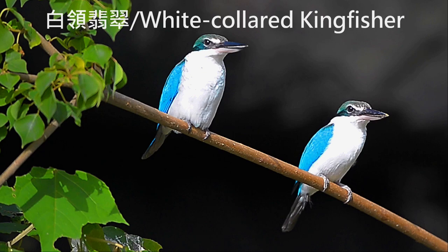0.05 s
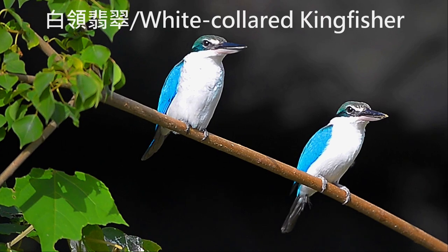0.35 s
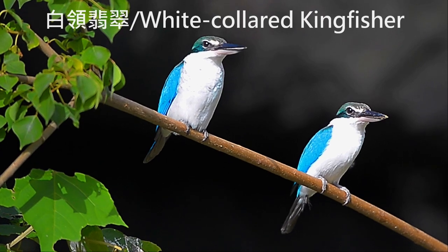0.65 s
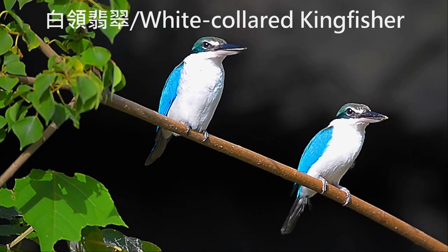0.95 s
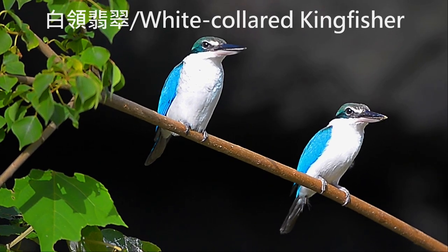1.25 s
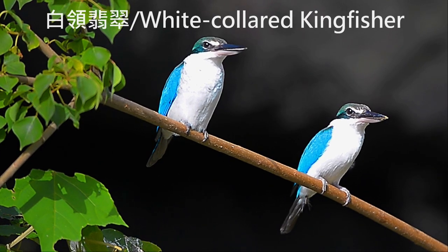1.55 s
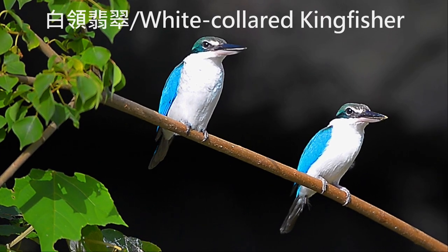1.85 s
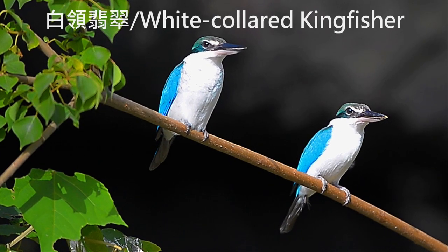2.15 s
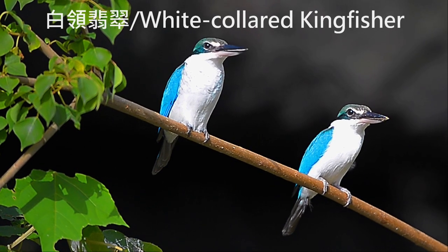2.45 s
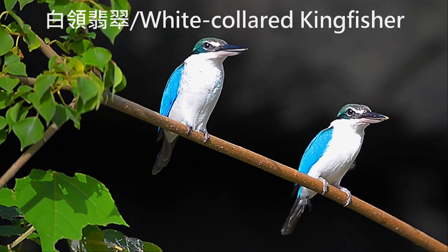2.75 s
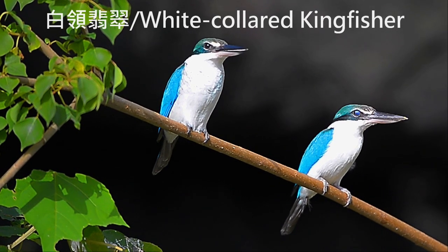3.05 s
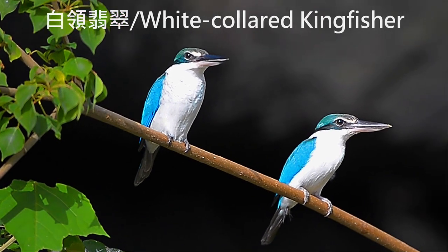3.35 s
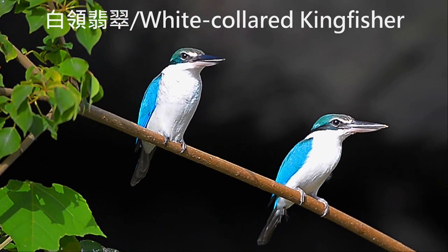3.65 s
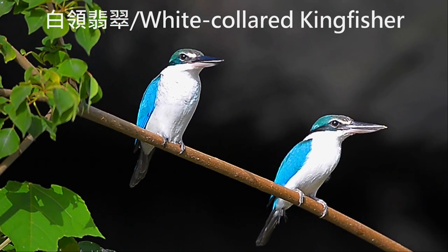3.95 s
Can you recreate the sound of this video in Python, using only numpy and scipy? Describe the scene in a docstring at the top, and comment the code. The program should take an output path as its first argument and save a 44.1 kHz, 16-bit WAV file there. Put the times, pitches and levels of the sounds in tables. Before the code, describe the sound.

A kingfisher gives four loud, falling calls, pauses, then gives two more, each run led by a softer note. The calls echo among trees over steady cicadas, faint distant birds, leaf hiss and a low rumble.

```python
"""Kingfisher in ringing woods

A kingfisher gives two runs of loud falling "kek" calls, each led by a softer arched note: harmonic
tones from its syrinx that reverberate among the trees. Behind it cicada tymbals drive narrow
resonances, far birds whistle and hoot, wood knocks, leaves hiss and a low rumble lies under everything.
Each loud call makes a compressor turn down the treble, so the cicadas duck."""
import sys
import numpy as np
from scipy import signal
from scipy.fft import rfft, irfft
from scipy.io import wavfile

SR = 44100
rng = np.random.default_rng(int(sys.argv[2]) if len(sys.argv) > 2 else 0)


def generate_wav(sig):
    """Save sig (samples, or channels by samples) to the path in sys.argv[1] as 16-bit PCM at SR."""
    pcm = np.round(np.clip(np.atleast_2d(sig).T, -1, 1) * 32767).astype(np.int16)
    wavfile.write(sys.argv[1], SR, pcm)


N = 176400
T = np.arange(N) / SR

# Levels in all tables are relative; each source applies its own gain.
# spectrum of the rumble and distant air: frequency_hz, density_db
RUMBLE_SPECTRUM = [(18, 5.5), (28, 0.5), (42, -3), (60, -10.5), (82, -5.5), (100, -15), (125, -19.5),
                   (180, -26), (215, -22.5), (300, -32), (440, -31), (600, -37.5), (900, -40),
                   (1400, -43.5), (1650, -37.5), (1900, -38)]
# spectrum of hissing leaves: frequency_hz, density_db
LEAF_SPECTRUM = [(1200, -16), (2000, 3), (3600, 9.5), (6000, -8), (7800, -19), (9500, -16), (11000, -20.5),
                 (15500, -21)]
# spectrum of a short rustle: frequency_hz, density_db
RUSTLE_SPECTRUM = [(3000, -25), (6000, -18), (9500, -17), (15000, -40)]
# spectrum of the far cicada chorus: frequency_hz, density_db
CHORUS_SPECTRUM = [(3700, -23), (4200, -10), (4500, -1), (4950, 0), (5250, -6), (5600, -15.5), (6100, -30),
                   (7000, -54.5)]
# cicada body resonances: centre_hz, bandwidth_hz, level_db
CICADA_RESONANCES = [(4544, 22, -39), (4678, 22, -39), (4834, 60, -37), (4995, 70, -36), (5058, 20, -35),
                     (5111, 16, -40), (5239, 20, -44), (8850, 600, -60)]
# a far bird's hoots: start_s, level_db
HOOT_NOTES = [(.07, -40), (1.023, -43), (1.333, -46), (1.535, -45), (1.721, -46), (2.234, -43.5),
              (2.677, -42), (2.999, -40.5), (3.383, -40.5), (3.91, -45.5)]
# distant knocks on wood: start_s, level_db
KNOCK_STRIKES = [(1.583, -27), (2.386, -35.5)]
# modes of the struck wood: frequency_hz, level_db, t60_s
WOOD_MODES = [(1020, -5, .05), (1130, -1, .06), (1240, 0, .06), (1370, -3, .05), (1520, -8, .04),
              (2150, -12, .03)]
# far birds' whistles: start_s, length_s, from_hz, to_hz, level_db
WHISTLE_NOTES = [(0.0, 0.076, 3250, 2897, -28), (0.0, 0.077, 1800, 1643, -39.5),
                 (.195, 0.024, 3230, 2820, -21.5), (0.198, 0.054, 1720, 1520, -40.5),
                 (1.862, 0.15, 4020, 3905, -32), (2.065, 0.16, 3980, 4030, -39.5),
                 (2.092, 0.05, 1790, 1815, -36.5), (2.208, 0.037, 1820, 1616, -34),
                 (2.318, 0.15, 2170, 2395, -32.5), (2.45, 0.051, 2475, 3204, -23.5),
                 (2.484, 0.041, 2950, 2670, -29.5), (3.255, 0.097, 1800, 1713, -36),
                 (3.376, 0.11, 1830, 1551, -39.5), (3.154, 0.042, 8300, 6540, -50)]
# contours of the two arched notes' second harmonic: time_s, pitch_hz, level_db
FIRST_ARCH = [(.31, 2420, -40), (0.323, 2390, -27.5), (0.334, 2662, -16), (0.368, 2740, -21.5),
              (.387, 2623, -11), (0.396, 2427, -22.5), (0.417, 1924, -34)]
SECOND_ARCH = [(3.455, 2600, -34), (3.464, 2448, -21), (3.474, 2850, -13), (3.496, 3083, -7),
               (3.515, 2929, -6.5), (3.526, 2617, -12.5), (3.545, 1930, -39)]
# harmonics of the arched notes and of the loud calls, from the fundamental up: level_db
ARCH_HARMONICS = [-21.5, -1.5, -22, -49, -61]
KEK_HARMONICS = [-22, 0, -40, -54, -58, -58]
# loud calls, pitched by the second harmonic: start_s, top_hz, length_s, level_db, dip_delay_s, dip_db
KEK_CALLS = [(.585, 3560, 0.076, 1.5, 0.033, 8.5), (.822, 3490, 0.092, 0.5, 0.028, 17.5),
             (1.08, 3449, .086, 0.5, 0.027, 6.5), (1.359, 3346, 0.087, -1.5, 0.014, 0.5),
             (3.7202, 3480, .076, 0.5, 0.025, 10), (3.967, 3446, 0.099, 2.5, 0.023, 14)]
# a call's leap and long slide in pitch: length_share, ratio_to_top
KEK_PITCH_CONTOUR = [(-.17, .79), (-.09, .85), (-.02, .92), (.015, .995), (.08, 1.0), (.18, .987),
                     (.3, .955), (.45, .905), (.6, .866), (.72, .83), (.8, .775), (.89, .69), (1.03, .53)]
# a call's envelope: length_share, level_db
KEK_ENVELOPE = [(-.17, -36), (-.1, -20), (-.01, -15), (.015, -4), (.13, 0), (.27, -2), (.45, -2),
                (.64, -2.5), (.78, -10), (.89, -20), (1.03, -40)]
# spectrum of the high, gritty rasp on the calls: frequency_hz, density_db
RASP_SPECTRUM = [(4000, -10), (6200, 10), (7200, 6), (8200, 0), (9500, -14), (11000, -15), (13000, -22),
                 (15000, -33)]


def from_db(db):
    """Amplitude ratio of a level in decibels."""
    return 10 ** (np.asarray(db) / 20)


def unit_rms(x):
    """Normalisation to unit mean power."""
    return x / np.sqrt(np.mean(x ** 2) + 1e-20)


def phase_of(hz):
    """Phase in radians is the time integral of angular frequency."""
    return 2 * np.pi * np.cumsum(hz) / SR


def drift(rate_hz):
    """Low-pass filtered noise gives a smooth random fluctuation of unit rms."""
    pole = np.exp(-2 * np.pi * rate_hz / SR)
    return unit_rms(signal.lfilter([1], [1, -2 * pole, pole * pole], rng.standard_normal(N + SR))[SR:])


def widen(mid_side, width=0.062, mono_below_hz=460):
    """Mid-side stereo: a weak, high-passed side signal gives a narrow image with centred bass."""
    mid, side = mid_side
    side = width * signal.sosfilt(signal.butter(1, mono_below_hz, "high", fs=SR, output="sos"), side)
    return np.array([mid + side, mid - side])


def noise(spectrum):
    """Spectral shaping of white noise: nearly mono, unit rms, falling steeply outside the given band."""
    hz, db = np.transpose(spectrum)
    bin_hz = np.maximum(np.arange(N // 2 + 1) * SR / N, 1)
    skirts = 1 + (bin_hz / hz[-1] / 1.1) ** 16 + (hz[0] / bin_hz / 1.2) ** 4
    gain = from_db(np.interp(np.log(bin_hz), np.log(hz), db)) / skirts
    return unit_rms(widen(irfft(rfft(rng.standard_normal((2, N))) * gain, N)))


def glide(start_s, length_s, from_hz, to_hz, db, waver):
    """A frequency-modulated linear sweep that swells and fades."""
    progress = np.clip((T - start_s) / length_s, 0, 1)
    envelope = from_db(db) * 2 * np.sqrt(2 * progress * (1 - progress))
    return envelope * np.sin(phase_of((from_hz + (to_hz - from_hz) * progress) * waver))


def air():
    """Broadband noise: steady rumble and leaf hiss, and one rustle under a Gaussian envelope."""
    rustle_s, spread_s = 3.635, .028
    rustle = from_db(-53) * np.exp(-((T - rustle_s) / spread_s) ** 2 / 2) * noise(RUSTLE_SPECTRUM)
    return from_db(-22) * noise(RUMBLE_SPECTRUM) + from_db(-43.5) * noise(LEAF_SPECTRUM) + rustle


def woods(source, t60_s=1.58, build_s=0.0067, trunks=24):
    """Reverberation: trunks return discrete early echoes, foliage scatters an exponential tail."""
    t = T[:2 * SR]
    onset = 1 - np.exp(-(t / build_s) ** 2)
    response = rng.standard_normal((2, len(t))) * from_db(-60 * t / t60_s) * onset
    response *= from_db(-6.5) / np.sqrt(np.sum(response[0] ** 2))
    for distance, strength in rng.random((trunks, 2)):
        delay_s = .012 + distance * .13
        response[0, int(delay_s * SR)] += from_db(-9) * (2 * strength - 1) * np.sqrt(3 / trunks)
    return widen(signal.fftconvolve(response, source[None], axes=1)[:, :N])


def cicadas(tymbal_hz=72.3, depth=0.12):
    """Amplitude modulation: tymbals pulse narrow body resonances over the blur of the far chorus."""
    pulsing = 1 + depth * np.sin(phase_of(tymbal_hz * (1 + 0.014 * drift(3.9))))
    out = from_db(-29) * noise(CHORUS_SPECTRUM)
    for hz, width_hz, db in CICADA_RESONANCES:
        body = signal.butter(2, [hz - width_hz / 2, hz + width_hz / 2], "band", fs=SR, output="sos")
        ringing = widen(signal.sosfilt(body, rng.standard_normal((2, N))))
        out += from_db(db) * pulsing * unit_rms(ringing)
    return out


def hoots():
    """Fast random frequency modulation makes a far bird's repeated falling note hoarse."""
    waver = 1 + .04 * drift(87.3)
    return sum(glide(start_s, length_s=0.0744, from_hz=780, to_hz=547, db=db, waver=waver)
               for start_s, db in HOOT_NOTES)


def knocks():
    """Free vibration: each knock excites the same exponentially damped modes of wood."""
    out = np.zeros(N)
    for start_s, db in KNOCK_STRIKES:
        age = np.maximum(T - start_s, 0)
        for hz, mode_db, t60_s in WOOD_MODES:
            decay_db = np.minimum(60 * age / t60_s, 200)
            out += from_db(db + mode_db - decay_db) * np.sin(2 * np.pi * hz * age)
    return out


def whistles():
    """Far birds' pure-tone glides, with frequency modulation that deepens with the interval swept."""
    unsteady = drift(91)
    out = np.zeros(N)
    for start_s, length_s, from_hz, to_hz, db in WHISTLE_NOTES:
        depth = .003 + 0.1234 * abs(np.log(to_hz / from_hz))
        out += glide(start_s, length_s, from_hz, to_hz, db, 1 + depth * unsteady)
    return out


def syrinx(times_s, second_harmonic_hz, db, harmonics_db, upper_gain_db=0):
    """Source and filter: a harmonic tone whose third partial sweeps through the beak's resonance."""
    beak_hz, beak_width_hz = 3045, 270
    flutter_from, edge_s = 0.65, 0.0017
    progress = (T - times_s[0]) / (times_s[-1] - times_s[0])
    # the note's falling end sounds rough and fluttering
    flutter = np.clip((progress - flutter_from) / (1 - flutter_from), 0, 1)
    jitter = 0.0033 * drift(150) + 0.01 * flutter * drift(244)
    shimmer_db = (0.67 + 5 * flutter) * drift(244)
    pitch_hz = np.interp(T, times_s, second_harmonic_hz) / 2 * (1 + jitter)
    level = from_db(np.interp(T, times_s, db) + shimmer_db)
    phase = phase_of(pitch_hz)
    # the fundamental thins at the top of the leap and swings less in level than the upper harmonics
    thinning_db = 0.76 * np.maximum(pitch_hz - 1704, 0)
    fundamental = from_db(harmonics_db[0] - thinning_db) * level ** 0.69 * np.sin(phase)
    overtones = sum(from_db(gain_db) * np.sin(k * phase) for k, gain_db in enumerate(harmonics_db[1:], 2))
    upper = level * from_db(upper_gain_db) * overtones
    resonance = np.exp(-((3 * pitch_hz - beak_hz) / beak_width_hz) ** 2 / 2)
    third = np.sqrt(level) * from_db(-6.5) * resonance * np.sin(3 * phase)
    edges = np.clip(np.minimum(T - times_s[0], times_s[-1] - T) / edge_s, 0, 1)
    return np.sqrt(2) * edges * (fundamental + upper + third)


def kingfisher(dip_width_s=0.0068):
    """Harmonic glides: two arched notes and six calls that leap, dip in level and fall away."""
    voice = sum(syrinx(*np.transpose(arch), ARCH_HARMONICS) for arch in (FIRST_ARCH, SECOND_ARCH))
    share, ratio = np.transpose(KEK_PITCH_CONTOUR)
    envelope_db = np.interp(share, *np.transpose(KEK_ENVELOPE))
    for start_s, top_hz, length_s, db, dip_delay_s, dip_db in KEK_CALLS:
        dip = -dip_db * np.exp(-((T - start_s - dip_delay_s) / dip_width_s) ** 2)
        voice += syrinx(start_s + share * length_s, top_hz * ratio, db + envelope_db, KEK_HARMONICS, dip)
    # a high, gritty rasp follows the calls' loudness
    rasp = from_db(-37) * np.abs(voice) * noise(RASP_SPECTRUM)[0]
    return voice + rasp


def scene():
    """Superposition in the woods: far sources have a lower ratio of direct to reverberant sound."""
    calls, whistling, hooting, knocking = kingfisher(), whistles(), hoots(), knocks()
    direct = calls + .22 * whistling + hooting + knocking
    reverberant = woods(calls + 1.9 * whistling + 1.1 * hooting + 1.3 * knocking)
    pan = from_db([[-0.5], [0.5]])  # slightly to the right
    return (direct + reverberant) * pan + cicadas() + air()


def record(dry):
    """Split-band compression and mild treble saturation, then soft limiting, a fade-in and a low-pass."""
    crossover_hz, cutoff_hz = 1260, 16600
    threshold_db, squeeze, attack_s, release_db_per_s = -7.5, 0.43, .0015, 87.5
    overload_share, overload_height, ceiling, knee = 0.069, 0.2, 1.05, 6.0
    start_s, fade_s = .037, .008
    low = signal.sosfiltfilt(signal.butter(2, crossover_hz, fs=SR, output="sos"), dry)
    high = dry - low
    over_db = np.maximum(20 * np.log10(np.abs(high).max(axis=0) + 1e-9) - threshold_db, 0)
    held_db = np.maximum.accumulate(over_db + release_db_per_s * T) - release_db_per_s * T
    pole = np.exp(-1 / (attack_s * SR))
    high *= from_db(-squeeze * signal.lfilter([1 - pole], [1, -pole], held_db))
    saturated = overload_height * np.tanh(high / overload_height)
    mix = low + high + overload_share * (saturated - high)
    mix /= (1 + np.abs(mix / ceiling) ** knee) ** (1 / knee)
    mix *= np.clip((T - start_s) / fade_s, 0, 1)
    return signal.sosfilt(signal.cheby2(12, 70, cutoff_hz, fs=SR, output="sos"), mix)


dry = scene()
out = record(dry)
generate_wav(out)
```